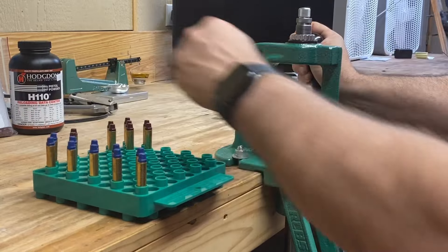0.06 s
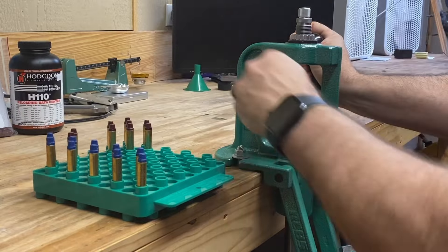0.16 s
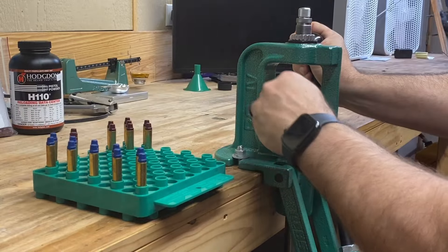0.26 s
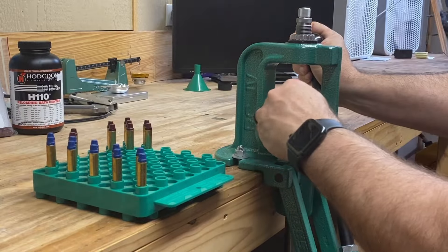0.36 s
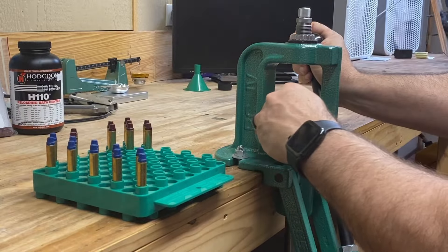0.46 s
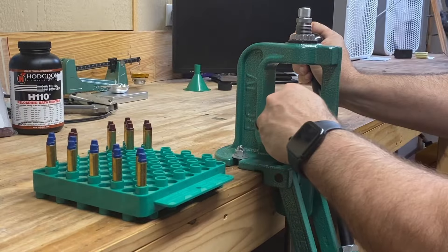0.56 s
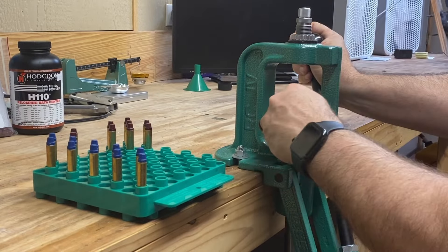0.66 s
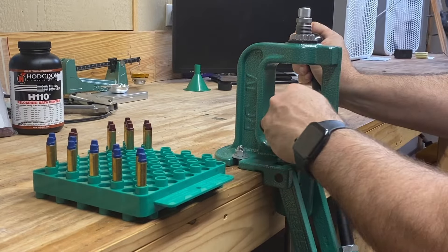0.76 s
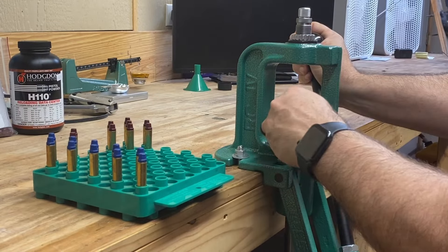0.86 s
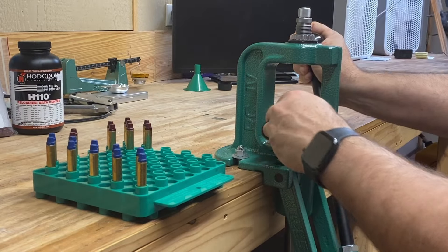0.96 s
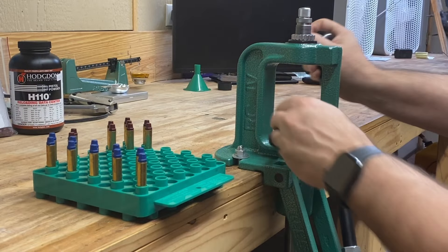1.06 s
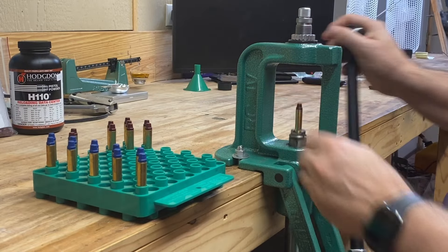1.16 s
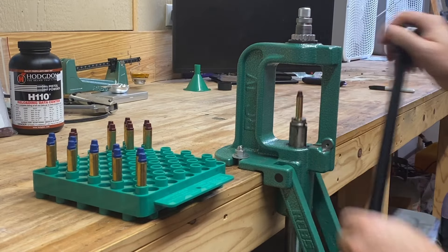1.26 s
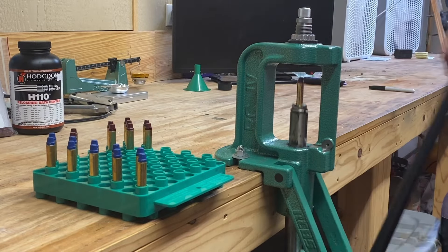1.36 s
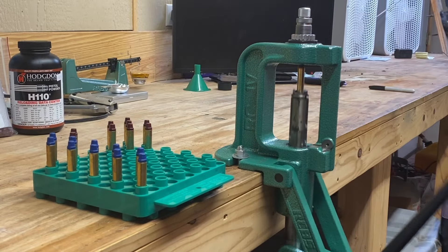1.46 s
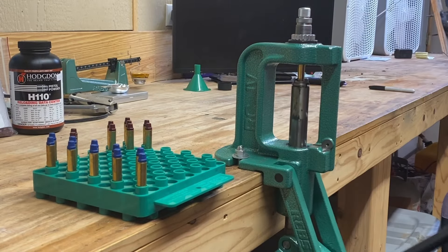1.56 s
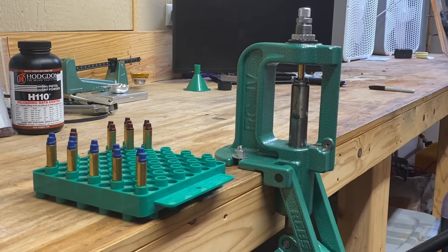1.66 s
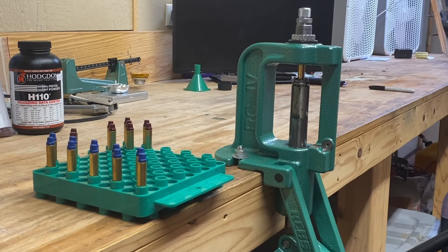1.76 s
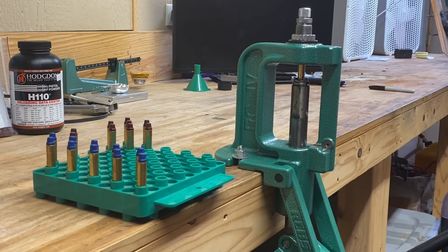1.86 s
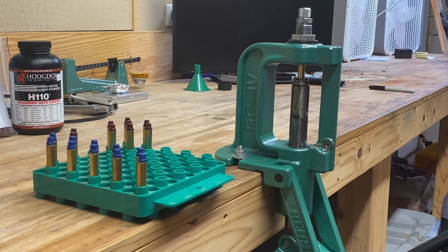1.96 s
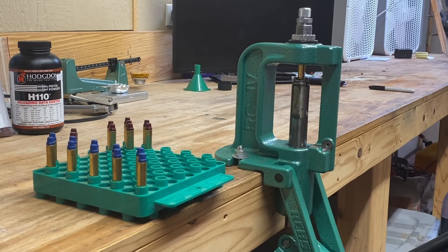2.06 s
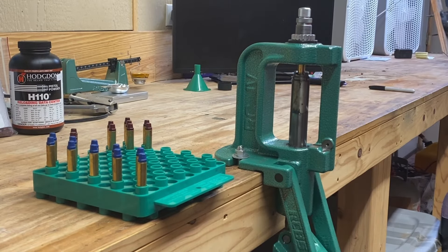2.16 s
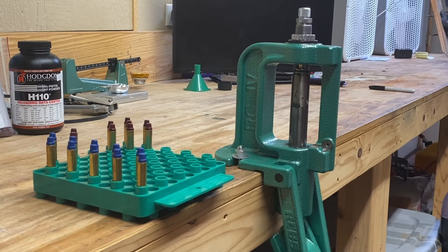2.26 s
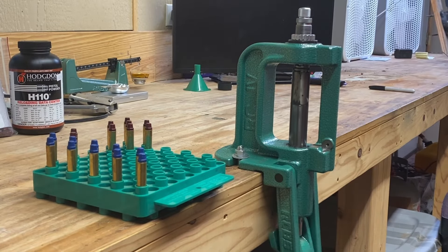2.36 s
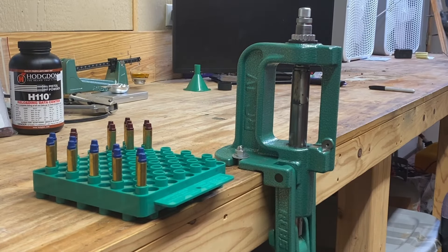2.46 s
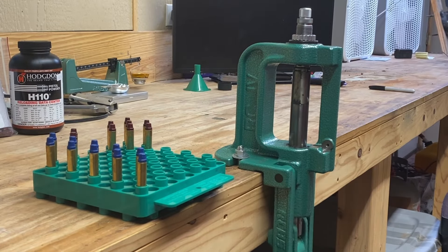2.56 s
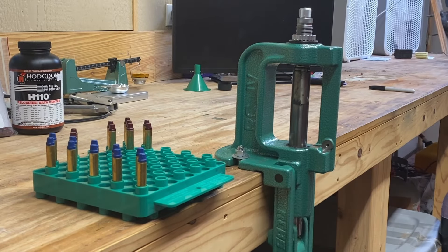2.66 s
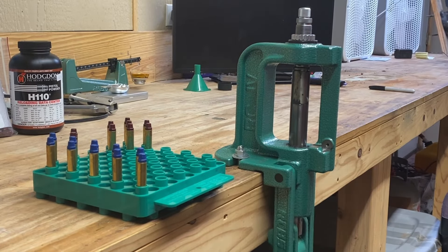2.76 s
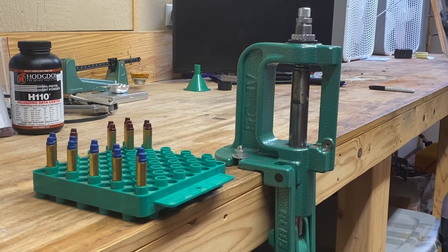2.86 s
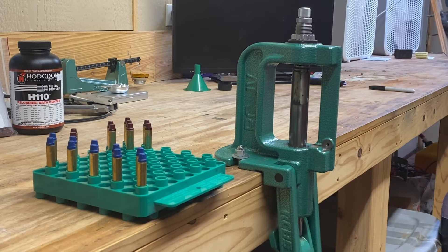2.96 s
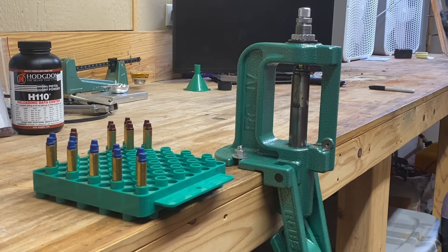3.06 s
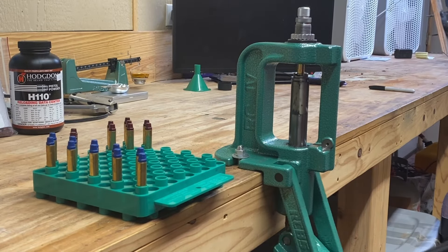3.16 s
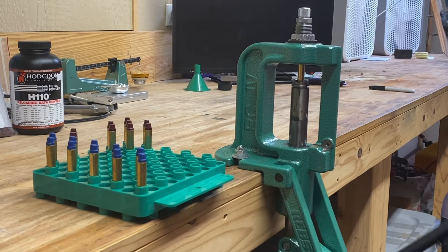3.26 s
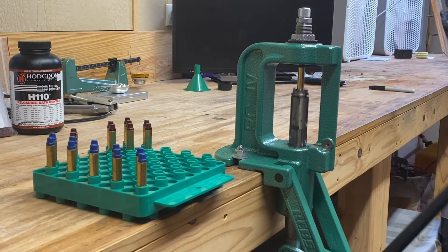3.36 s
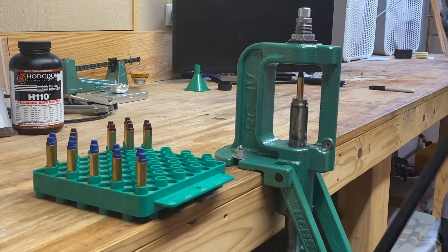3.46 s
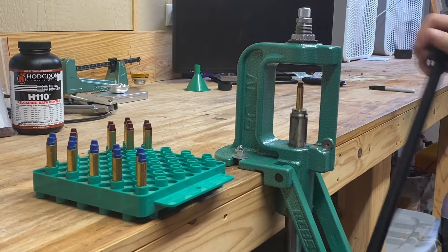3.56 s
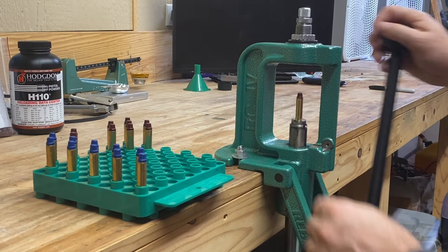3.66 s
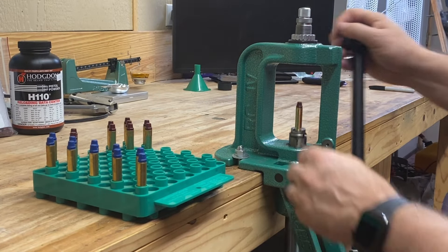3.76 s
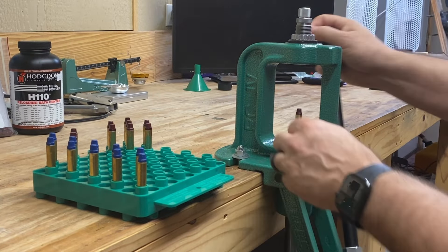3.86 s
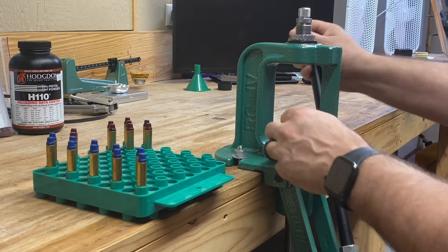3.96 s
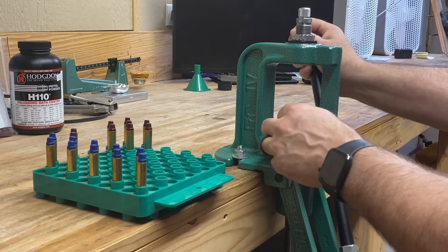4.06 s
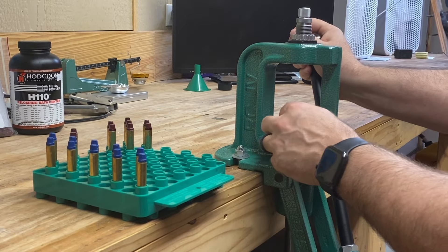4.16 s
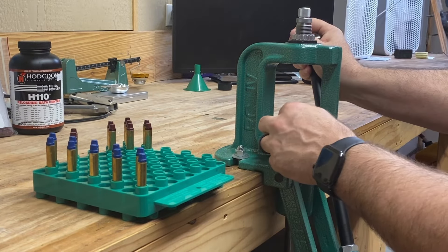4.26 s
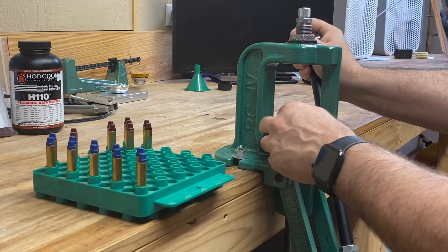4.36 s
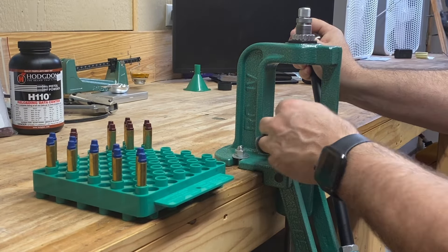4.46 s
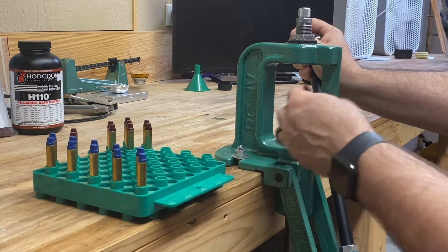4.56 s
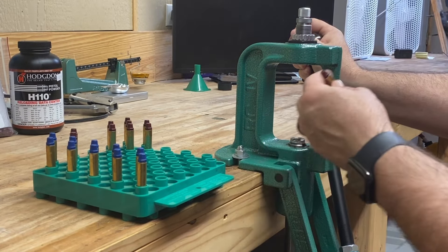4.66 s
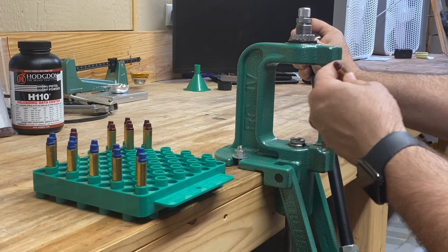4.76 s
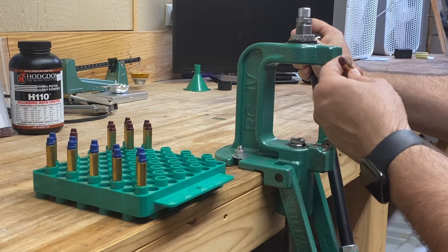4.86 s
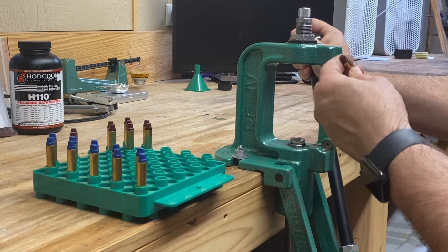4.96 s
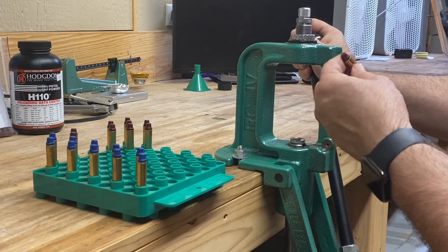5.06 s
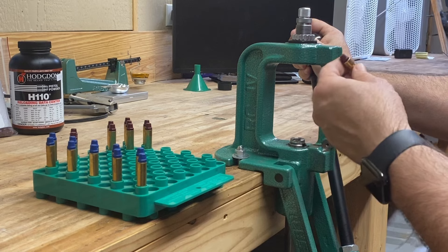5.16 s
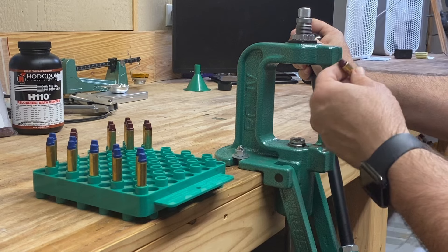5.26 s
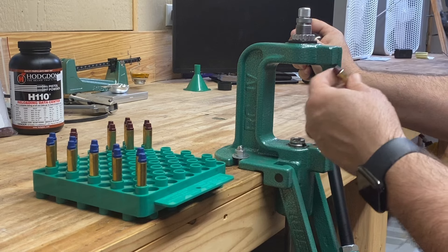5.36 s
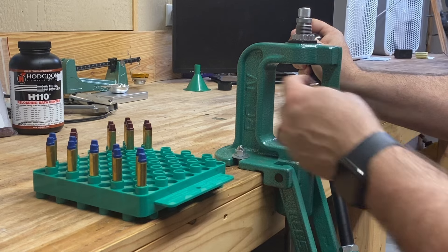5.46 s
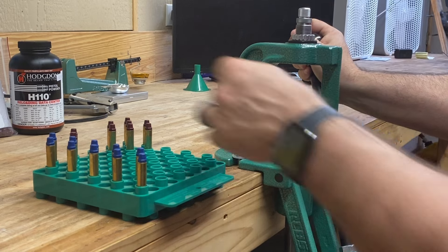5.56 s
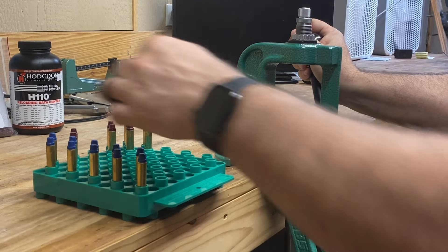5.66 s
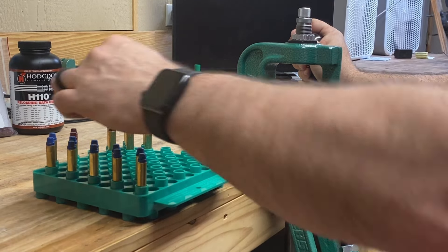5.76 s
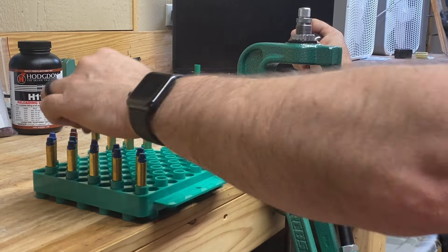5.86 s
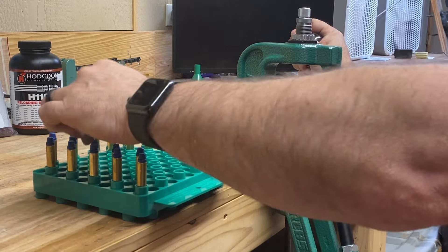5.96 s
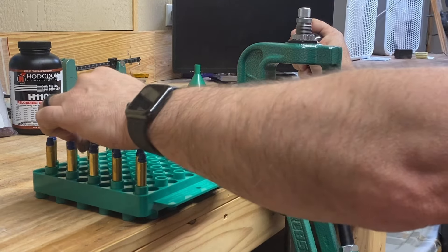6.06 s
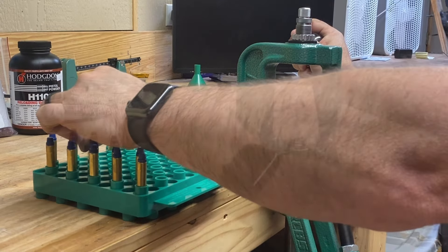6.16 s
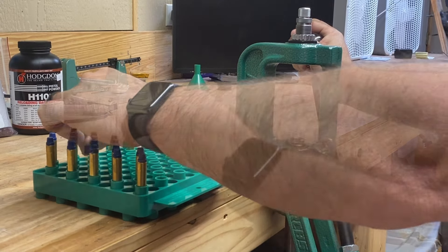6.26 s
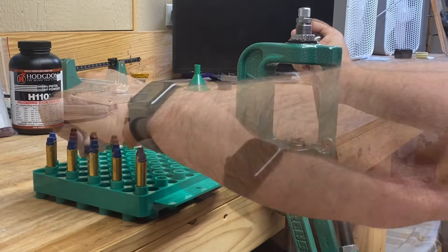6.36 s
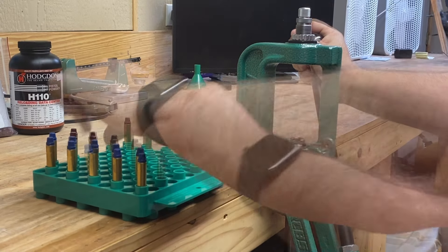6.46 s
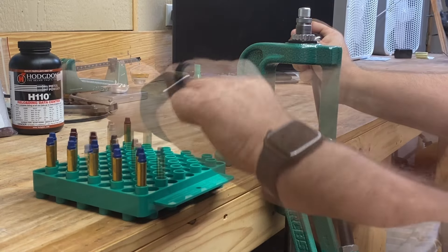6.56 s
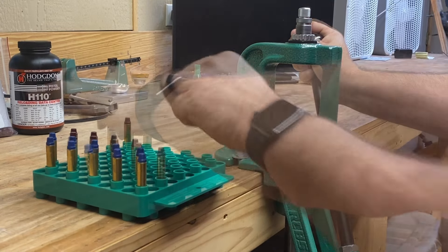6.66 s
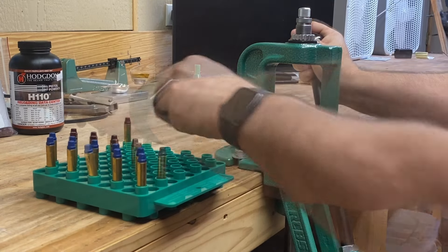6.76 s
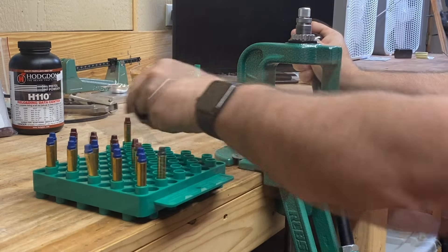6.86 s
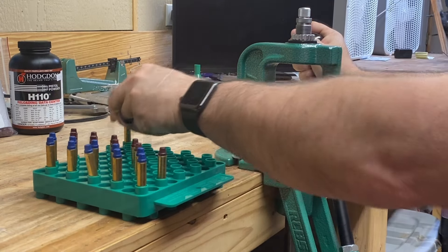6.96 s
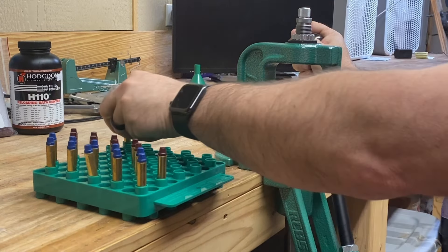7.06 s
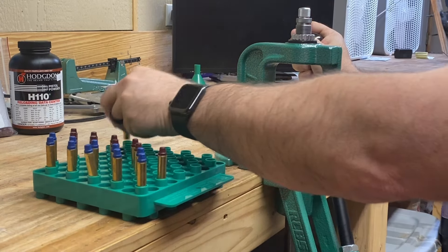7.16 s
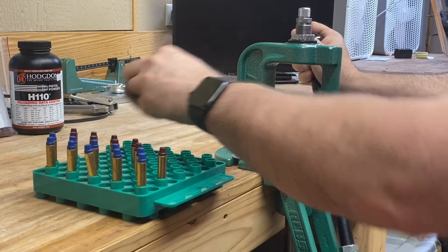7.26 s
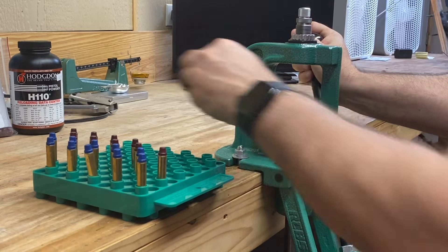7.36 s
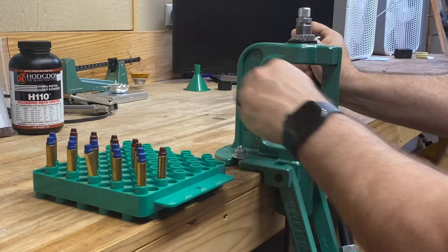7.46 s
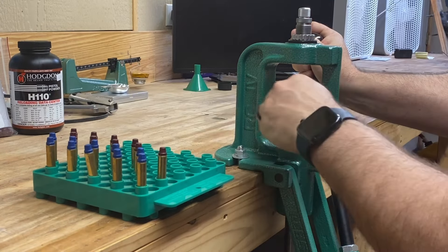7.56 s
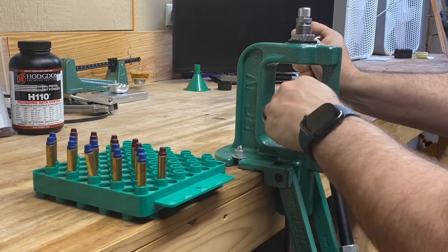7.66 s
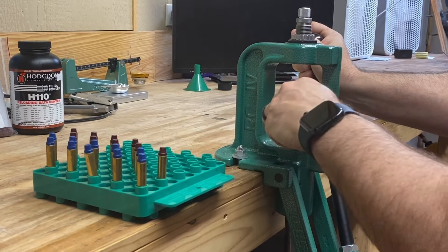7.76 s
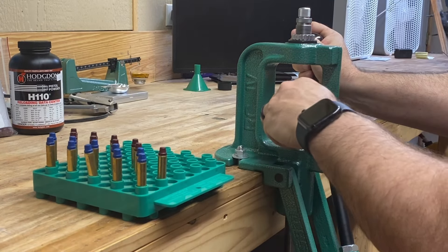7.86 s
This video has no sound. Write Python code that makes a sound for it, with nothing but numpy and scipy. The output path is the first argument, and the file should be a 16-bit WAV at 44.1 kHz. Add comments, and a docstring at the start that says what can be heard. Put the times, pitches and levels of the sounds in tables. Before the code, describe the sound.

A quiet fan rumbles and hums steadily in a small, briefly reverberant workshop, heard close in stereo. From 0.1 to 0.9 s a finger-held brass case ticks dully, clicks and scrapes into a steel holder. An iron press clunks at 1.05 s, with a faint oily hiss as its ram rises, then a low thud at 1.6 s. Heavier clanks at 2.15-2.4 s shake the wooden bench; a dull knock with a short steel ring ends the stroke at 2.6 s. At 3.15 s a crisp snap leads the loudest quick burst of clanks, and a softer clunk follows at 4.0 s. The case clicks and scrapes out at 4.2-4.4 s. After a pause, it knocks a hollow plastic block at 6.0-6.4 s. A small click at 6.8 s, light taps and a short rub near 7.1 s draw out the next case, which clicks and scrapes in at 7.8 s.

```python
"""A cast-iron reloading press clunks and shakes its wooden bench in a small workshop with a fan running.
A brass case clicks and scrapes into the shell holder, and the oiled ram hisses as it slides up and down.
The round is dropped into a plastic block and the next case is drawn out.
Blows are noise bursts, mostly with ringing tones; the main ones have a strength and a hardness that tilts
them towards the treble. Slides are coloured noise that swells and dies with the speed."""
import sys
import numpy as np
from scipy import signal
from scipy.fft import rfft, irfft, next_fast_len
from scipy.io import wavfile
from scipy.ndimage import uniform_filter1d

SR = 44100
rng = np.random.default_rng(int(sys.argv[2]) if len(sys.argv) > 2 else 0)


def waveform_to_disk(signal):
    """Save audio, clipped to [-1, 1], as 16-bit WAV at the path in sys.argv[1]."""
    frames = np.transpose(np.atleast_2d(signal))
    scaled = np.clip(frames, -1, 1) * 32767
    samples = np.round(scaled).astype(np.int16)
    wavfile.write(sys.argv[1], SR, samples)


N = 349272
TIME = np.arange(N) / SR
RING_TIME = TIME[:int(0.45 * SR)]  # time axis of one blow or one room response

# Fan and room air. Colour of the rush: pitch_hz, relative_level_db
AIR_COLOUR = [(20, -36), (36, -15.5), (58, -1.5), (175, -8), (225, -10), (301, -7.5), (384, -16.5),
              (463, -16.5), (790, -23.5), (1100, -27), (1800, -37), (2400, -43.5), (5000, -52),
              (15000, -55.5)]
AIR_LEVEL_DB = -56
# Motor and blade tones of the fan: pitch_hz, level_db
FAN_TONES = [(118.4, -66), (161.5, -67.5), (183.0, -60.5), (296.1, -63), (479.1, -70.5)]
# Stereo width of the air, side against middle: pitch_hz, level_db
AIR_WIDTH = [(60, -17), (200, -11), (380, -6), (700, -3.5), (1300, 0.5), (2400, -12), (4400, -21.5)]
# Stereo width of the workshop sound, shape over pitch: pitch_hz, relative_level_db
ROOM_WIDTH = [(60, -14), (150, -18), (300, -9), (600, -4.5), (1400, 0), (2200, -14.5), (3100, -14),
              (4200, -38), (12000, -19.5)]
ROOM_T60_LOW_S, ROOM_T60_HIGH_S = 0.46, 0.35  # time to fall by 60 dB

# Ram and case sliding up into the die and out again: start_s, length_s, relative_level_db
RAM_STROKES = [(1.02, .72, -65), (2.2, 0.54, -66.5), (2.85, 0.2, -69), (3.3, 0.2, -68)]
# Colour of oiled steel sliding: pitch_hz, relative_level_db
OIL_COLOUR = [(900, -2), (1500, 5), (3000, -1), (5000, -0.5), (7500, -7), (10500, -11), (13000, -12),
              (15000, -47)]
# Case rim dragged in the shell holder: start_s, length_s, relative_level_db
RIM_SCRAPES = [(.565, 0.24, -53.5), (4.275, 0.11, -44.5), (7.81, .1, -57.5)]
# Colour of the rim's friction: pitch_hz, relative_level_db
RIM_COLOUR = [(300, -1.5), (560, 13), (1100, -5), (1850, 10), (3050, 7), (3800, -6.5), (5000, -8),
              (7500, -29), (10500, -31.5), (14000, -45)]
# Case drawn along the wall of its hole in the block: start_s, length_s, peak_level_db
BLOCK_DRAGS = [(6.85, 0.04, -60.5), (7.117, .062, -42)]
# Colour of brass rubbing on plastic: pitch_hz, relative_level_db
RUB_COLOUR = [(400, -23), (800, -3), (1250, 8.5), (1750, -6.5), (2350, 0.5), (3100, -8), (3700, -23.5),
              (6000, -25), (11000, -39), (14500, -25)]
# Friction grows as this power of the sliding speed
OIL_SPEED_POWER, RIM_SPEED_POWER, DRAG_SPEED_POWER = 1.58, 0.31, 1.5

# Case held in the fingers bumping the press frame: start_s, level_db
FINGER_BUMPS = [(0.122, -50.5), (.325, -53.5), (0.871, -59)]
# Colour of a finger-damped case: pitch_hz, relative_level_db
DAMPED_CASE_COLOUR = [(600, -21), (1000, 0), (1250, 4), (1600, -11), (2400, -19), (4000, -42), (10000, -54)]

# The shell holder butts against the die at the top of the stroke
STOP_S, STOP_DB = 2.573, -48
# Ringing tones of the die: pitch_hz, relative_level_db, t60_s (time to fall by 60 dB)
DIE_MODES = [(1860, -3, .06), (2000, -2.5, 0.11), (2130, -7, 0.071), (2350, -3, .045)]
# The case breaks free of the die on the way down
RELEASE_S, RELEASE_DB = 3.1545, -36
# Colour of that snap: pitch_hz, relative_level_db
SNAP_COLOUR = [(1500, -30), (4000, -1), (7000, -0.5), (11000, -0.5), (15000, -1)]

# Cases against the plastic block: start_s, strength_db, hardness_db, contact_spread_s
BLOCK_TAPS = [(6.037, -29, 7.5, 0.0026), (6.192, -35.5, -13.5, 0.0012), (6.332, -43, -7, .0023),
              (6.359, -44, 5.5, 0.00069), (7.088, -49.5, -15, 0.002), (7.141, -52, 2, 0.0011),
              (7.17, -61, 9, 0.001)]
# Ringing tones of the block: pitch_hz, relative_level_db, t60_s
BLOCK_MODES = [(790.4, 1, 0.15), (877, -7, 0.097), (1030, -15.5, 0.033), (1269, 7, 0.075),
               (1326, -4, 0.064), (1620, -9, 0.056), (1940, -10, 0.059), (2028, -13.5, 0.073),
               (2306, 8.5, 0.0422), (2360, -2.5, 0.019), (2600, 9.5, 0.025), (3070, 3, 0.061),
               (3084, 1.5, 0.039)]
# Colour of the block's dense, quickly damped tones: pitch_hz, relative_level_db
PLASTIC_COLOUR = [(100, -31), (350, -14), (660, -17.5), (830, -4), (1400, -2), (1750, -4), (2300, -8.5),
                  (2600, -6), (3100, -2), (3350, -13.5), (3850, -17.5), (5500, -20), (8000, -33.5),
                  (12000, -45), (14500, -32)]
# Upper edges of a tap's registers: edge_hz
TAP_EDGES_HZ = [1046, 2250, 3280]
# Register levels of a middling tap, one more for the top: relative_level_db
TAP_BALANCE_DB = [1.5, 2.5, -5, -23]

# Small clicks of a brass case, mostly against the steel shell holder and die, one at the plastic block:
# start_s, strength_db, hardness_db
CASE_CLICKS = [(.213, -87.5, 40.5), (0.4607, -47.5, 9), (.599, -44.5, 1), (.714, -47, -23),
               (0.743, -49.5, 1.5), (1.001, -64.5, -19), (1.363, -55, 0.5), (2.357, -55.5, -3),
               (3.147, -57, 28), (3.1525, -37.5, 12.5), (4.205, -44.5, -6), (4.27, -56, 2),
               (6.822, -57.5, -31), (7.803, -42, -27.5)]
# Ringing tones of case and holder: pitch_hz, relative_level_db, t60_s
HOLDER_MODES = [(1775, -3.5, 0.049), (2192, -3, .045), (2407, 3, 0.024), (2975, 1.5, 0.037),
                (2890, -7, 0.013), (6560, -10, 0.0065), (9760, -13, 0.015)]
# Colour of the brass's dense, quickly damped tones: pitch_hz, relative_level_db
BRASS_COLOUR = [(500, -17), (1200, -7.5), (1800, 2), (3100, 1), (3900, -5.5), (5500, -7.5), (7000, -5.5),
                (10500, -3), (12500, -22), (15000, -18)]
# Upper edges of a click's registers: edge_hz
CLICK_EDGES_HZ = [4150, 8700]
# Register levels of a middling click, one more for the top: relative_level_db
CLICK_BALANCE_DB = [0.5, -12.5, -21.5]

# Linkage and ram blows: start_s, strength_db, hardness_db, contact_spread_s
PRESS_CLUNKS = [(1.051, -31.5, -7.5, 0.0025), (1.599, -44, 9.5, 0.0048), (1.611, -30, -13, 0.0035),
                (2.145, -34.5, -5, 0.019), (2.210, -27, 4, 0.0025), (2.226, -25, 0.5, 0.0024),
                (2.378, -36.5, -3.5, 0.0055), (2.574, -26, -18.5, .003), (3.154, -25, 11, 0.0058),
                (3.194, -24.5, 12, 0.0018), (3.216, -21, -3, 0.00464), (3.245, -23.5, 11, 0.0014),
                (3.968, -31.5, 0, 0.0098)]
# Ringing tones of the wooden bench: pitch_hz, relative_level_db, t60_s
BENCH_MODES = [(49.6, -9, 0.51), (71.5, -6, 0.15), (98.3, -6.5, 0.39), (120.4, -7.5, 0.2), (139.6, 6, 0.13),
               (175.9, 0.5, 0.13), (218.7, -5, 0.12), (266.6, -5, 0.25), (311.1, -3.5, 0.21),
               (345.5, -2, 0.18), (451.7, -10.5, .2)]
# Ringing tones of the iron frame: pitch_hz, relative_level_db, t60_s
FRAME_MODES = [(574, -4, 0.054), (614, -9.5, 0.27), (806, 4, 0.18), (960, -19, .12), (1040, -14.5, 0.1),
               (1117, -9, 0.1), (1287, 3, 0.11), (1623, 4.5, 0.09), (1840, -13, 0.25), (2083, 8, 0.057),
               (2333, -2, 0.066), (2950, -14, 0.067), (2940, -0.5, 0.066)]
# Colour of the iron's dense, quickly damped tones: pitch_hz, relative_level_db
IRON_COLOUR = [(40, -10.5), (120, 10.5), (330, -3), (600, 0.5), (1300, -6), (2500, -2.5), (3100, -11),
               (3700, -15.5), (6000, -25), (8000, -36.5), (10500, -37.5), (15000, -42.5)]
# Upper edges of a clunk's registers: edge_hz
CLUNK_EDGES_HZ = [200, 600, 1700, 3500]
# Register levels of a middling clunk, one more for the top: relative_level_db
CLUNK_BALANCE_DB = [0.5, -5.5, -12.5, -19.5, -29.5]

TOP_HZ = 15800  # the treble is cut above this
PORT_LAG_S = 0.00022  # delay between the microphone ports in the high treble


def amp(db):
    """Turn decibels into gain."""
    return 10 ** (np.asarray(db) / 20)


def unit(x):
    """Scale to an rms (average strength) of 1."""
    return x / np.sqrt(np.mean(x ** 2))


def crest(x, size=256):
    """Scale so that the loudest few milliseconds have rms 1."""
    return x / np.sqrt(uniform_filter1d(x ** 2, size).max())


def add(track, start_s, sound):
    """Mix a sound into the track at its start time."""
    start = int(start_s * SR)
    track[start:start + len(sound)] += sound[:N - start]


def curve_gain(points, size):
    """Gain at each filter frequency, drawn through the points on a logarithmic pitch scale."""
    hz, db = np.transpose(points)
    freqs = np.maximum(np.fft.rfftfreq(size, 1 / SR), 1)
    return amp(np.interp(np.log(freqs), np.log(hz), db))


def colour(x, points, size=4096):
    """Filter to the given spectrum without sounding ahead of the input."""
    # Folding the cepstrum forward in time gives the filter its earliest possible response
    cepstrum = irfft(np.log(curve_gain(points, size)))
    cepstrum[1:size // 2] *= 2
    cepstrum[size // 2 + 1:] = 0
    response = irfft(np.exp(rfft(cepstrum)))
    return signal.oaconvolve(x, response)[:len(x)]


def widen(x, points, size=2048):
    """Make a side signal: the sound a quarter cycle later, weighted by a spectrum."""
    response = np.fft.fftshift(irfft(-1j * curve_gain(points, size)))
    return signal.oaconvolve(x, response[1:], mode="same")


def left_right(mid, side):
    """Make two channels from their common part and their difference."""
    return np.array([mid + side, mid - side])


def onset(rise_s):
    """Smooth start of a sound; a longer contact builds up more slowly."""
    return 1 - np.exp(-(RING_TIME / rise_s) ** 2)


def decay(t60_s):
    """Exponential fade by 60 dB in the given time."""
    return np.exp(-np.log(1000) * RING_TIME / t60_s)


def ring(modes, rise_s, scatter_db):
    """Decaying tones; each blow lands on another spot and shares its energy differently."""
    total = np.zeros(len(RING_TIME))
    for hz, db, t60_s in modes:
        size = amp(db + scatter_db * rng.standard_normal())
        wave = np.sin(2 * np.pi * (hz * RING_TIME + rng.random()))
        total += size * wave * decay(t60_s)
    return crest(total * onset(rise_s))


def burst(spectrum, rise_s, t60_s):
    """Countless close tones that die together, made from coloured noise."""
    noise = rng.standard_normal(len(RING_TIME))
    return crest(colour(noise * onset(rise_s) * decay(t60_s), spectrum))


def tilt(balance_db, strength_db, hardness_db):
    """Register levels of a blow: hardness acts fully on the top register and not at all on the bottom one."""
    return strength_db + np.array(balance_db) + hardness_db * np.linspace(0, 1, len(balance_db))


def voice(x, edges_hz, levels_db):
    """Split a blow into registers and set each one's level: harder contacts put more into the upper ones."""
    n = next_fast_len(2 * len(x))
    freqs = np.fft.rfftfreq(n, 1 / SR)
    rest = rfft(x, n)
    out = np.zeros(len(x))
    for edge_hz, db in zip(edges_hz, levels_db):
        low = rest / (1 + (freqs / edge_hz) ** 10)
        rest = rest - low
        out += amp(db) * crest(irfft(low, n)[:len(x)])
    return out + amp(levels_db[-1]) * crest(irfft(rest, n)[:len(x)])


def swell(moves, power):
    """Each move speeds up and slows down in a half sine; its friction follows a power of that speed."""
    gain = np.zeros(N)
    for start_s, length_s, db in moves:
        speed = np.abs(np.sin(np.linspace(0, np.pi, int(length_s * SR))))
        add(gain, start_s, amp(db) * speed ** power)
    return gain


def fan():
    """Steady rush of air with a few motor and blade tones that waver in strength and phase."""
    mid = unit(colour(rng.standard_normal(N), AIR_COLOUR))
    side = unit(colour(rng.standard_normal(N), AIR_COLOUR))
    air = amp(AIR_LEVEL_DB) * left_right(mid, widen(side, AIR_WIDTH))
    knots = np.linspace(0, TIME[-1], num=40)
    hum = np.zeros(N)
    for hz, db in FAN_TONES:
        waver = np.interp(TIME, knots, rng.standard_normal(len(knots)))
        tone = np.sin(2 * np.pi * hz * TIME + 0.98 * waver)
        hum += amp(db) * (1 + 0.12 * waver) * tone
    return air + hum


def reverb():
    """Diffuse room response of energy 1, made from fading noise; the treble dies sooner."""
    noise = rng.standard_normal(len(RING_TIME))
    low = signal.sosfilt(signal.butter(1, 4000, fs=SR, output="sos"), noise)
    high = noise - low
    tail = low * decay(ROOM_T60_LOW_S) + high * decay(ROOM_T60_HIGH_S)
    tail *= onset(0.0098)
    return tail / np.linalg.norm(tail)


def workshop(dry):
    """Direct sound, slightly out of phase between the channels, and a diffuse tail from all around."""
    # Colour of the room tail: pitch_hz, level_db
    wet = colour(dry, [(60, -6), (300, -4.5), (900, -4.5), (3000, -7.5), (7000, -6.0), (14000, -5.5)])
    mid = dry + signal.oaconvolve(wet, reverb())[:N]
    side_tail = signal.oaconvolve(dry, reverb())[:N]
    side = amp(-1.0) * mid + amp(-7.5) * side_tail
    return left_right(mid, widen(side, ROOM_WIDTH))


def slide():
    """Oiled steel hisses as it slides, louder when it moves faster."""
    hiss = unit(colour(rng.standard_normal(N), OIL_COLOUR))
    return amp(-1.5) * hiss * swell(RAM_STROKES, OIL_SPEED_POWER)


def scrape():
    """The case sticks and slips; each gritty pulse rings the brass in the holder or rasps on the plastic."""
    # About 650 slips a second, of uneven size, each fading over 3 ms
    slips = (rng.random(N) < 650 / SR) * amp(1.6 * rng.standard_normal(N))
    pressure = signal.lfilter([1], [1, -np.exp(-1 / (0.003 * SR))], slips)
    grit = (unit(pressure) + 0.63) * rng.standard_normal(N)
    rung = signal.fftconvolve(grit, ring(HOLDER_MODES, rise_s=0.0004, scatter_db=1.5))[:N]
    steel = amp(-3.5) * unit(colour(grit, RIM_COLOUR)) + amp(-9.5) * unit(rung)
    plastic = unit(colour(grit, RUB_COLOUR))
    on_steel = steel * swell(RIM_SCRAPES, RIM_SPEED_POWER)
    on_plastic = plastic * swell(BLOCK_DRAGS, DRAG_SPEED_POWER)
    return on_steel + on_plastic


def bumps():
    """The fingers damp the case, so it meets the frame with a small dull tick."""
    out = np.zeros(N)
    for start_s, level_db in FINGER_BUMPS:
        tick = burst(DAMPED_CASE_COLOUR, rise_s=0.00036, t60_s=0.047)
        add(out, start_s, amp(level_db) * tick)
    return out


def die():
    """Steel meets steel with a short ring at full stroke; the case later lets go with a dry snap."""
    out = np.zeros(N)
    add(out, STOP_S, amp(STOP_DB) * ring(DIE_MODES, rise_s=0.002, scatter_db=3.0))
    add(out, RELEASE_S, amp(RELEASE_DB) * burst(SNAP_COLOUR, rise_s=0.0005, t60_s=0.0071))
    return out


def block():
    """A case knocks the hollow plastic block; a glancing touch builds up more slowly."""
    out = np.zeros(N)
    for start_s, strength_db, hardness_db, spread_s in BLOCK_TAPS:
        knock = burst(PLASTIC_COLOUR, rise_s=spread_s, t60_s=0.035)
        tones = ring(BLOCK_MODES, rise_s=spread_s, scatter_db=1.0)
        levels_db = tilt(TAP_BALANCE_DB, strength_db, hardness_db)
        add(out, start_s, voice(knock + amp(-4.0) * tones, TAP_EDGES_HZ, levels_db))
    return out


def case_clicks():
    """The brass case clicks with a short ring, mostly against steel and once at the plastic block."""
    out = np.zeros(N)
    for start_s, strength_db, hardness_db in CASE_CLICKS:
        snap = burst(BRASS_COLOUR, rise_s=0.0028, t60_s=0.063)
        tones = ring(HOLDER_MODES, rise_s=0.0022, scatter_db=4.5)
        levels_db = tilt(CLICK_BALANCE_DB, strength_db, hardness_db)
        add(out, start_s, voice(snap + amp(-2) * tones, CLICK_EDGES_HZ, levels_db))
    return out


def press():
    """Slack in the linkage closes: the iron clanks and the heavy bench swings up more slowly under it."""
    out = np.zeros(N)
    for start_s, strength_db, hardness_db, spread_s in PRESS_CLUNKS:
        clank = burst(IRON_COLOUR, rise_s=spread_s, t60_s=0.16)
        frame = ring(FRAME_MODES, rise_s=spread_s, scatter_db=8.5)
        bench = ring(BENCH_MODES, rise_s=0.012, scatter_db=1.5)
        blow = clank + amp(-5.5) * frame + amp(0.5) * bench
        levels_db = tilt(CLUNK_BALANCE_DB, strength_db, hardness_db)
        add(out, start_s, voice(blow, CLUNK_EDGES_HZ, levels_db))
    return out


def scene():
    """Press, case and block sound into the workshop over the fan."""
    friction = slide() + scrape()
    blows = bumps() + die() + block() + case_clicks() + press()
    return workshop(friction + blows) + fan()


def record(dry):
    """In the high treble the two microphone ports drift apart in phase, left behind right; the top is cut."""
    n = next_fast_len(N)
    hz = np.fft.rfftfreq(n, 1 / SR)
    # Phase difference in radians, shared equally by the two channels
    lag = 2 * np.pi * PORT_LAG_S * (hz - 6800) * (hz > 7500)
    turn = np.exp(0.5j * np.array([-lag, lag]))
    ports = irfft(rfft(dry, n) * turn, n)[:, :N]
    top_cut = signal.ellip(8, 0.2, 70, TOP_HZ, fs=SR, output="sos")
    return signal.sosfilt(top_cut, ports)


dry = scene()
out = record(dry)
waveform_to_disk(out)
```